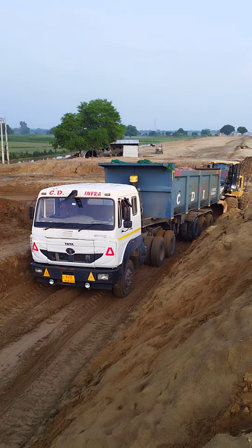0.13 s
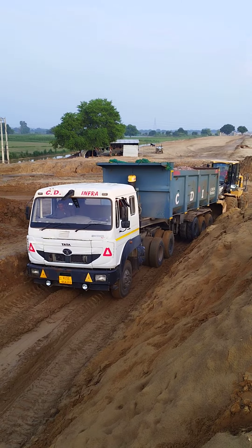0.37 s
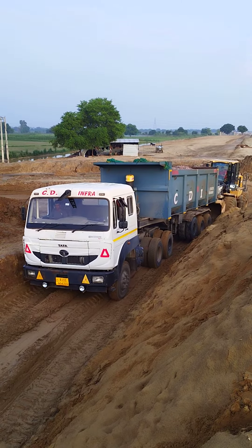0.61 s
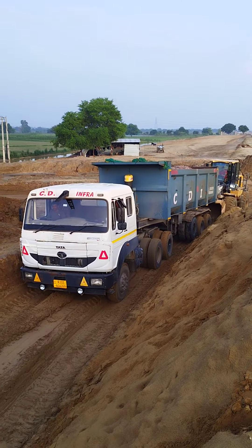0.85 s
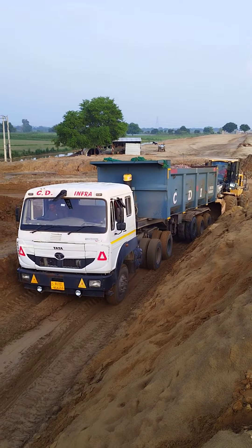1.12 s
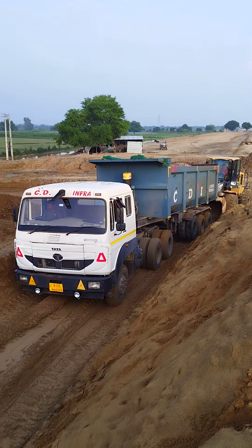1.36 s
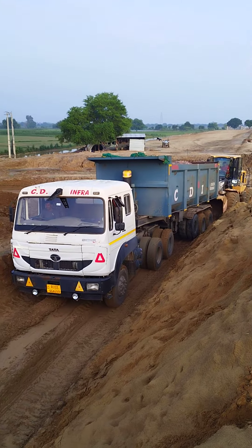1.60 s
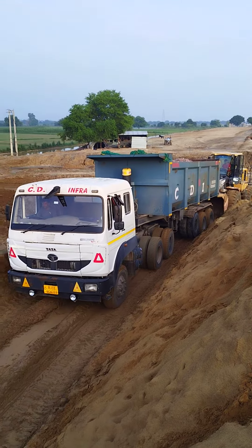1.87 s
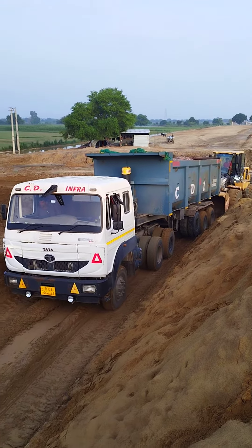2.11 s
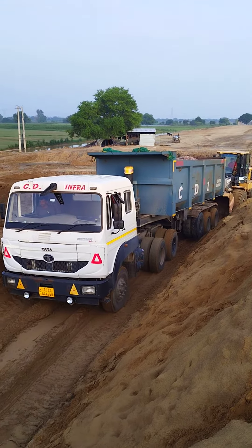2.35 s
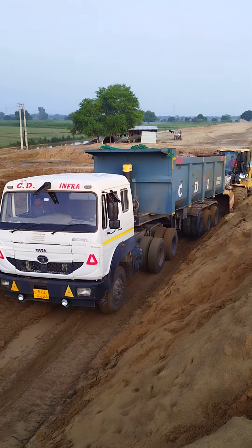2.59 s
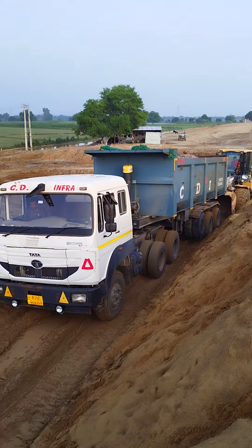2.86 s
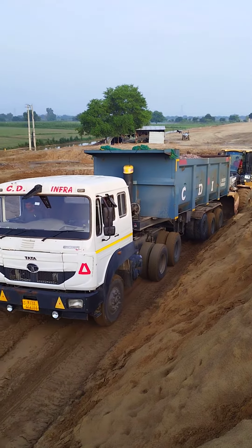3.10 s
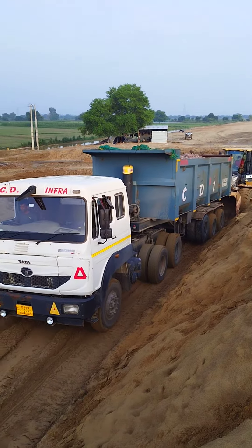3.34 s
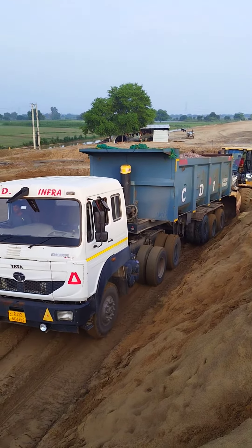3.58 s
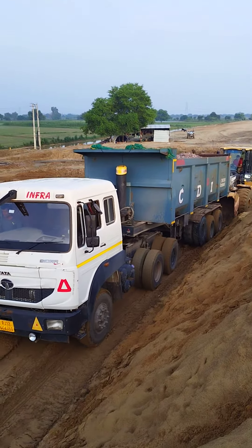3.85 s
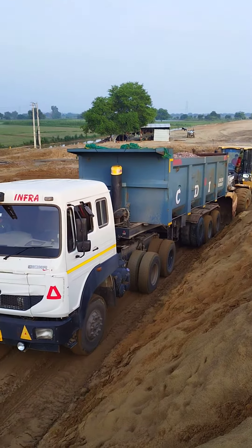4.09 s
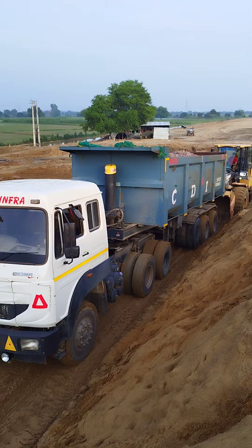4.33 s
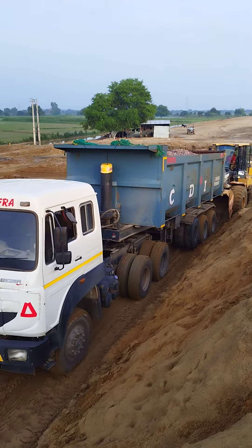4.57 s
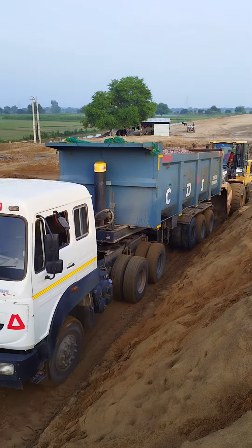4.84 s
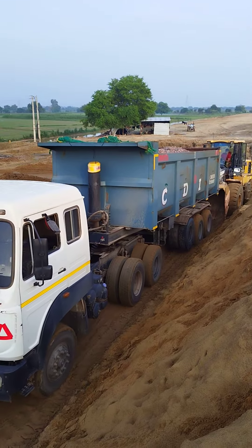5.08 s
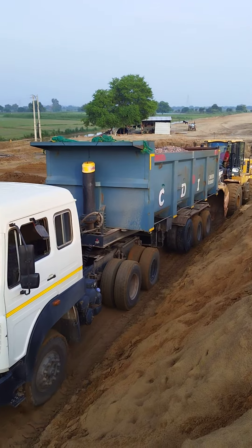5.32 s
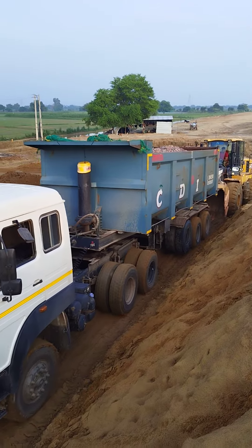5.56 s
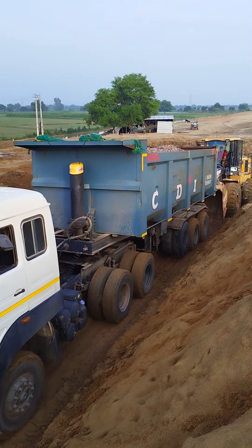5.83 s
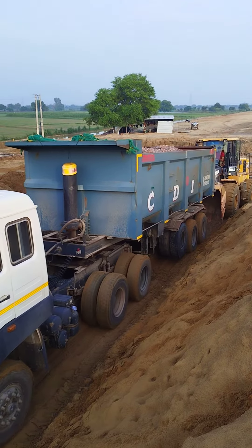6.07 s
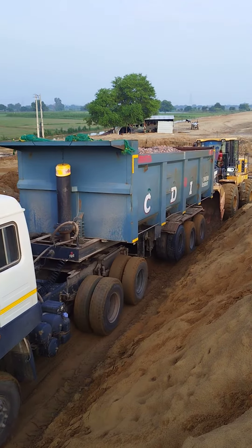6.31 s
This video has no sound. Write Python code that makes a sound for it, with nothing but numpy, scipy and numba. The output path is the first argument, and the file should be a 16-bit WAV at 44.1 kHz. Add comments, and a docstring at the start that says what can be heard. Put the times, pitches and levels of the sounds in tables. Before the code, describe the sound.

A heavy diesel truck is already labouring close by at 0 s, outdoors, caught in stereo by a phone. The thick low exhaust drone climbs from about 65 to 90 Hz by 1.7 s, then wavers slightly around there, load swelling and sagging. Rough mid-range clatter, valve tick and breathy hiss run throughout, over low rumble, a swelling pump hum and a thin, high turbo whistle. Steel sides drum softly in the first three seconds. From 1.3 to 5.9 s a loader's hum grows behind, over its own low drone. At 3.1 s a hard hollow steel bang makes the level duck briefly. At 4.4-4.6 s a small dry squeal slides downward, ending in a knock. From 4.7 to 5.4 s heavy body booms tumble, with a bright clattering knock at 5.3 s. Weaker thuds fade by 5.8 s; the engine drones on to the cut at 6.4 s.

```python
"""Diesel tipper pushed through soft sand

A six-cylinder tipper pulls hard past a phone's two microphone ports while a loader pushes from behind.
The exhaust drones as sines on the firing rate; clatter, valves and hiss are noise shaped by each rap of
the block. Near by, a gear pump hums, the steel body booms in ringing modes and knocks in noise bursts.
A joint squeals in falling partials, the turbo whistles, and the loader hums and drones behind the trailer.
The phone's limiter ducks after the loudest peaks."""
import sys
import numpy as np
from scipy import signal
from scipy.fft import rfft, irfft, next_fast_len
from scipy.io import wavfile
from scipy.ndimage import uniform_filter1d, map_coordinates
from numba import njit

SR = 44100
rng = np.random.default_rng(int(sys.argv[2]) if len(sys.argv) > 2 else 0)


def waveform_to_disk(signal):
    """Save audio, clipped to [-1, 1], as 16-bit WAV at the path in sys.argv[1]."""
    frames = np.transpose(np.atleast_2d(signal))
    scaled = np.clip(frames, -1, 1) * 32767
    samples = np.round(scaled).astype(np.int16)
    wavfile.write(sys.argv[1], SR, samples)


def voltage_ratio(level):
    """Linear amplitude factor for a level in decibels (scalar or array-like)."""
    return 10 ** (np.asarray(level, float) / 20)


N = 284004
T = np.arange(N) / SR  # time in seconds


# the engine under load: start_s, firing_hz, exhaust_load_db, block_past_cab_db
ENGINE = [(0, 65.28, 1.5, -2.5), (0.6, 74.25, 4.5, 1), (1.05, 81.76, -0.5, -3), (1.45, 87.2, 2.5, 1),
          (1.7, 89.8, -1, -0.5), (2.4, 89.17, 1.5, 1.5), (2.95, 92.1, -1, 0), (3.08, 92.05, -2, 2),
          (3.14, 90.76, -4, 0), (3.2, 91.2, 0, 0), (3.45, 87.18, 3, 2.5), (3.9, 88.6, -0.5, 1),
          (4.4, 90.53, 1.5, 2.5), (4.62, 89.86, 0, 1), (4.7, 89.36, -1, -1.5), (4.8, 89.47, -2, -2.5),
          (4.92, 90, 0, -1.5), (5.03, 89.5, -1, 0.5), (5.1, 89.55, 2.5, 2), (5.14, 89.06, 3.5, 2.5),
          (5.2, 89.5, -0.5, 2), (5.4, 91.46, 0.5, -1), (5.52, 91.6, 2.5, 0.5), (5.6, 91.2, -4, 0),
          (6.0, 87.2, -0.5, 0), (6.44, 87.2, 0.5, 2)]


def truck(shudders):
    """One crank drives it all: exhaust follows the load, the block is heard past the cab with echoes."""
    firing_hz, load_db, block_db = curves(ENGINE)
    firings = np.cumsum(firing_hz * (1 + 0.00408 * walk(30))) / SR
    pipe = voltage_ratio(load_db) * exhaust(firing_hz, firings)
    heard_block = voltage_ratio(block_db) * echoes(block(firings), db=-15.5)
    return pipe + heard_block + pump(firing_hz) + rumble(firings, shudders)


# the pipe booms most when the engine lugs: firing_hz, level_db (before the load)
NOTE = [(66, -10.5), (78, -12), (87, -14.5), (90, -16), (92, -19)]
# its octave: firing_hz, level_db (before the load)
OCTAVE = [(66, -24), (74, -30.5), (80, -30.5), (84.5, -21.5), (90, -21), (92, -27.5)]
# uneven cylinders: multiple of the four-stroke cycle, level_db (before the load)
UNEVEN = [(4, -39), (9, -36), (10, -35), (16, -39), (19, -37), (26, -39)]


def exhaust(firing_hz, firings):
    """Puffs make a note on the firing rate and its octave; uneven cylinders add cycle harmonics."""
    # the octave is locked to the note; each puff leans further forward as the pipe draws level
    lean = .1 + .35 * T  # radians
    note = voltage_ratio(at(NOTE, firing_hz) + 0.21 * walk(25.3)) * np.cos(2 * np.pi * firings)
    octave = voltage_ratio(at(OCTAVE, firing_hz) + 1.4 * walk(12)) * np.cos(4 * np.pi * firings + lean)
    lumps = 0
    for multiple, db in UNEVEN:
        phase = 2 * np.pi * (multiple * firings / 6 + rng.random())
        lumps = lumps + voltage_ratio(db + 3.0 * walk(5.4)) * np.sin(phase)
    return np.sqrt(2) * (note + octave + lumps)


# knock of each cylinder in firing order: level_db (relative)
CYLINDERS_DB = [0, -1.5, -3.5, -4.5, -4, -2]


def raps(firings):
    """Every combustion raps the block, some cylinders harder: a decaying envelope of rms 1."""
    which = firings.astype(int)
    strength = voltage_ratio(np.array(CYLINDERS_DB)[which % 6] + 5.4 * rng.standard_normal(N // 100)[which])
    decay = 1 + 0.07 * np.exp(-(firings % 1) / 0.23)  # decay in firings
    rap = uniform_filter1d(strength * decay, size=120)
    return rap / np.sqrt(np.mean(rap ** 2))


# clatter of the block: pitch_hz, level_db (per Hz, relative)
CLATTER = [(280, -53), (480, -15.5), (585, -13), (756, -5), (852, -8.5), (940, -2.5), (1040, -9.5),
           (1230, -12), (1450, -3.5), (2000, -20.5), (2600, -32), (4400, -120)]
# valve gear: pitch_hz, level_db (per Hz, relative)
VALVES = [(1150, -6.5), (1950, -8), (2660, -2.5), (3080, -8), (4510, -21.5), (6500, -26.5), (11000, -120)]
# intake hiss: pitch_hz, level_db (per Hz, relative)
HISS = [(2060, -60), (3500, -7.5), (6100, -7), (7900, -3), (9310, -6), (12800, -16), (15100, -14),
        (15800, -16)]
CLATTER_DB, VALVES_DB, HISS_DB = -29, -31.5, -35.5  # before the raps and the path past the cab


def block(firings):
    """Coloured noise that each rap lifts slightly; clatter and valves repeat with the engine cycle."""
    rap = raps(firings)
    cycles = firings / 6
    clatter = voltage_ratio(CLATTER_DB) * noise(CLATTER, flicker_db=1.0, rate=12., cycles=cycles) * rap ** 0.11
    valves = voltage_ratio(VALVES_DB) * noise(VALVES, flicker_db=1.3, rate=12., cycles=cycles) * rap ** 0.19
    hiss = voltage_ratio(HISS_DB) * noise(HISS, flicker_db=1.1, rate=11.) * rap ** 0.15
    hiss = hiss * (1 + .08 * np.cos(2 * np.pi * cycles))  # the intake breathes once a cycle
    return clatter + valves + hiss


# short reflections off ground, bank and trailer: delay_ms, drift_ms_per_s
ECHOES_MS = [(4.1, -.10), (7.3, .06), (11.9, -.15), (17.6, .12)]


def echoes(x, db):
    """Reflections whose paths change as the truck creeps on: narrow peaks that wander."""
    out = x.copy()
    for ms, drift in ECHOES_MS:
        place = np.arange(N) - (ms + drift * T) * SR / 1000
        out += voltage_ratio(db) * np.array([map_coordinates(port, [place], order=2, mode="mirror") for port in x])
    return out / np.sqrt(1 + len(ECHOES_MS) * voltage_ratio(2 * db))


# the pump's hum swells: peak_s, level_db
PUMP = [(1.2, -29), (2.4, -34.5), (3.4, -32.5), (5.7, -36), (6.402, -33)]
PUMP_DB, PUMP_SWELL_S = -44.5, 0.28  # hum between swells, spread of a swell


def pump(firing_hz):
    """A gear pump hums as one sine geared to the crank, rising and falling in swells."""
    level = voltage_ratio(PUMP_DB) + sum(swell(s, db, PUMP_SWELL_S) for s, db in PUMP)
    return level * tone(5.29 * firing_hz, 2 * walk(10))


# low rumble: pitch_hz, level_db (per Hz, relative)
RUMBLE = [(25, 1), (40, -11.5), (65, -5), (113, -3), (134, -9), (228, -5), (473, -14), (560, -30),
          (730, -56)]
# trailer sides that drum along: pitch_hz, level_db (per Hz, relative)
PANELS = [(250, -43), (290, -4), (335, -7), (385, -5), (430, -43)]
# drumming over rippled sand: peak_s, level_db, spread_s
DRUMMING = [(.3, -27.5, 0.49), (1.75, -27.5, 0.34), (2.3, -27.5, 0.24), (2.85, -28.5, 0.22),
            (4.4, -34, 0.35), (4.92, -21, 0.096), (5.55, -27, 0.26)]
RUMBLE_DB = -24.5  # before the shudders add to it
SHAKE_DB, SHAKE_S = -7, 0.17  # how much shudders feed the rumble, and their smoothing time


def rumble(firings, shudders):
    """Low noise gains power from the smoothed power of the shudders; the trailer sides drum in swells."""
    pole = 1 / (SHAKE_S * SR)
    shake = voltage_ratio(2 * SHAKE_DB) * signal.lfilter([pole], [1, pole - 1], shudders ** 2)
    level = np.sqrt(voltage_ratio(2 * RUMBLE_DB) + abs(shake))
    low = level * noise(RUMBLE, flicker_db=1.5, rate=4.9, cycles=firings / 6)
    drumming = sum(swell(*row) for row in DRUMMING)
    return low + drumming * noise(PANELS, flicker_db=3.0, rate=7.7)


# steel body modes: pitch_hz, width_hz
BODY = [(48, 12.06), (155, 10.5), (185, 35), (250, 16), (295, 38), (355, 15.5), (388, 23)]
# shudders over the ruts: peak_s, level_db (at a perfectly matched mode), shaken_hardest_hz, swell_s
BOOMS = [(.5, -18, 388, 0.05), (0.649, -26, 295, 0.46), (2.26, -28, 375, 0.046), (3.083, -19, 395, 0.0076),
         (3.088, -13, 266, 0.0098), (3.101, -11, 178, 0.01), (3.122, -3, 269.5, 0.008),
         (3.142, -13, 256, 0.0088), (3.165, -12, 170, 0.016), (4.645, -23.5, 390, 0.017),
         (4.703, -10, 345.2, 0.047), (4.85, -3.5, 155, 0.021), (4.979, -7, 153, 0.04),
         (5.1, -4.5, 155, 0.0047), (5.145, -15, 174, 0.014), (5.18, -9, 154.8, 0.0055),
         (5.265, -10, 170.8, .025), (5.26, -15.5, 48, .034), (5.31, -11, 164, 0.02),
         (5.368, -8.5, 275, 0.013), (5.49, -10.5, 260, 0.017), (5.555, -15, 160.2, 0.0082),
         (5.62, -13, 267, 0.019), (5.68, -18, 159, 0.017), (5.78, -17, 176.3, 0.015),
         (5.81, -19.5, 48.02, 0.014)]


def booms():
    """Each shudder swells the body modes near its pitch, which then ring down by their width."""
    out = np.zeros(N)
    for mode_hz, width in BODY:
        swing = np.zeros(N)
        for s, db, hz, swell_s in BOOMS:
            i = slice(max(int((s - 3 * swell_s) * SR), 0), int((s + .3) * SR))
            t = T[i] - s
            near = np.exp(-(np.log(mode_hz / hz) / 0.089) ** 2)
            shape = np.where(t < 0, np.exp(-(t / swell_s) ** 2), np.exp(-np.pi * width * t))
            swing[i] += voltage_ratio(db) * near * shape
        # loose plates and load rattle along: the ring wobbles in pitch and strength
        out += swing * tone(mode_hz * (1 + 0.015 * walk(40)), 2.5 * walk(70))
    return out


# steel on steel: peak_s, level_db, centre_hz, width_hz, decay_s
KNOCKS = [(3.075, -22.5, 7950, 5600, .004), (3.084, -30, 7400, 900, 0.02), (3.085, -21.5, 560.2, 750, .06),
          (4.636, -30, 7800, 5000, .012), (4.65, -24.5, 608.3, 775, 0.091), (5.236, -28, 3300, 2500, .012),
          (5.272, -33, 8000, 9000, .04), (5.292, -21.5, 4500, 4320, 0.021),
          (5.292, -18.5, 2230, 1700, 0.036), (5.298, -20, 895, 454, 0.064), (5.6, -25, 1200, 1300, .04)]


def knocks():
    """Band-passed noise bursts, partly common to both ports: loose steel chatters to a peak and dies."""
    out = np.zeros((2, N))
    t = np.arange(-SR // 20, SR // 5) / SR
    for s, db, hz, width, decay in KNOCKS:
        rise = 0.47 * decay
        edges = [max(hz - width / 2, 200), min(hz + width / 2, 15000)]
        band = signal.butter(2, edges, "bandpass", fs=SR, output="sos")
        chatter = rng.standard_normal((3, len(t))) * voltage_ratio(2.7 * rng.standard_normal(len(t)))
        burst = signal.sosfilt(band, chatter[0] + 1.0 * chatter[1:])
        shape = np.where(t < 0, np.exp(-(t / rise) ** 2), np.exp(-t / decay))
        i = int(s * SR) - SR // 20
        out[:, i:i + len(t)] += voltage_ratio(db) * burst / burst.std() * shape
    return out


# the squeal's glide: start_s, pitch_hz
SQUEAL = [(4.36, 5110), (4.405, 5040), (4.416, 4880), (4.44, 4800), (4.46, 4810), (4.515, 4760),
          (4.53, 4660), (4.56, 4570), (4.6, 4480)]
# its partials: partial, peak_s, level_db, spread_s
SQUEAL_SWELLS = [(1, 4.385, -38, .022), (1, 4.42, -37, .016), (1, 4.472, -43, .03), (1, 4.545, -39, .022),
                 (2, 4.385, -44, .025), (2, 4.43, -41, .025), (2, 4.485, -40, .025), (2, 4.53, -36, .032),
                 (3, 4.49, -54, .05)]


def squeal():
    """A dry joint slips and sings, falling in pitch, its partials swelling in turn."""
    hz = curves(SQUEAL)[0] * (1 + 0.0022 * walk(90))
    return sum(swell(s, db, spread) * tone(k * hz, 1.5 * walk(40)) for k, s, db, spread in SQUEAL_SWELLS)


# the whistle: start_s, pitch_hz, level_db
TURBO = [(0, 9200, -57), (.6, 9700, -56), (1.5, 11600, -59.5), (2.75, 11700, -59.5), (3.25, 10900, -64),
         (4.1, 12250, -58.5), (5, 11700, -62), (6.44, 12450, -61)]


def turbo():
    """The turbocharger's thin whistle is one unsteady sine whose pitch moves with boost."""
    hz, db = curves(TURBO)
    return tone(hz * (1 + .008 * walk(60)), db + 3.5 * walk(14))


# loader at steady revs behind the trailer: pitch_hz, level_db
LOADER_EXHAUST = [(108.5, -34), (144.5, -33)]
LOADER_DB, LOADER_IDLE_DB = -39, -49  # hum while pushing and otherwise, before the port balance
PUSH_FROM_S, PUSH_TO_S, PUSH_RAMP_S = 1.328, 5.915, 0.15


def loader():
    """A hydraulic hum that grows while it pushes, favouring the left port, over a low exhaust drone."""
    pushing = np.clip(np.minimum(T - PUSH_FROM_S, PUSH_TO_S - T) / PUSH_RAMP_S + .5, 0, 1)
    hum_db = LOADER_IDLE_DB + (LOADER_DB - LOADER_IDLE_DB) * pushing
    hum = tone(748 * (1 + .003 * walk(18)), hum_db + 3.5 * walk(12))
    drone = sum(tone(hz * (1 + 0.00422 * walk(2.5)), db + 1.0 * walk(5.1)) for hz, db in LOADER_EXHAUST)
    return hum * voltage_ratio([[2.5], [-2.5]]) + drone


# sound common to both ports: pitch_hz, share
ALIKE = [(300, 1), (690, 0.39), (950, 1), (1250, 0.47), (2600, 0.71), (4000, 0.095), (12000, 0.2)]
# balance of the ports: pitch_hz, left_minus_right_db
BALANCE_DB = [(340, -1), (520, -6.5), (700, 11), (870, 3), (1100, 1), (1500, -2), (2500, 0), (7200, -2.5),
              (10300, 4.5), (13000, -1)]
# the phone's case turns the left port's phase: pitch_hz, turn_radians
TURN = [(300, 0.03), (900, 0.067), (1200, 0.5), (1500, 0.53), (2400, 0.026)]
# what each four-stroke cycle repeats of the one before: pitch_hz, share
REPEATS = [(150, 0), (250, .5), (1100, .6), (1600, .5), (2400, .2), (3200, 0)]
PATTERN_DRIFT = .07  # slow change of the repeated pattern, radians per cycle


def noise(colour, flicker_db, rate, cycles=None):
    """Coloured noise at both ports, rms 1; half-octaves flicker apart; part may repeat with the cycle."""
    size = next_fast_len(N)
    hz = np.arange(size // 2 + 1) * SR / size
    white = rfft(rng.standard_normal((3, size)))
    if cycles is not None:
        steps = 2048  # noise points in the pattern of one cycle
        place = cycles % 1 * steps
        patterns = rng.standard_normal((6, steps))
        played = [np.interp(place, np.arange(steps), row, period=steps) for row in patterns]
        old, new = np.reshape(played, (2, 3, N))
        again = np.cos(PATTERN_DRIFT * cycles) * old + np.sin(PATTERN_DRIFT * cycles) * new
        repeated = at(REPEATS, hz)
        white = np.sqrt(1 - repeated) * white + np.sqrt(repeated) * rfft(again, size)
    common, left, right = white
    share = np.clip(at(ALIKE, hz), 0, 1)
    pair = np.sqrt(share) * common + np.sqrt(1 - share) * np.array([left, right])
    tilt = voltage_ratio(at(BALANCE_DB, hz) / 2) * np.exp(-.5j * at(TURN, hz))
    inside = (hz > colour[0][0]) * (hz < colour[-1][0])
    pair = pair * voltage_ratio(at(colour, hz)) * np.array([tilt, 1 / tilt]) * inside
    half_octave = 2 * np.log2(np.maximum(hz, 1))
    lowest, highest = int(2 * np.log2(colour[0][0])), int(2 * np.log2(colour[-1][0]))
    out = 0
    for k in range(lowest, highest + 2):
        band = irfft(pair * np.clip(1 - abs(half_octave - k), 0, 1), size)[:, :N]
        out = out + band * voltage_ratio(flicker_db * walk(rate))
    return out / np.sqrt(np.mean(out ** 2))


def tone(hz, db):
    """A sine of moving pitch at an rms level."""
    return np.sqrt(2) * voltage_ratio(db) * np.sin(2 * np.pi * (np.cumsum(hz) / SR + rng.random()))


def swell(s, db, spread):
    """A bell-shaped rise and fall."""
    return voltage_ratio(db) * np.exp(-((T - s) / spread) ** 2)


def walk(rate):
    """Random levels held 1 / rate s and slewed twice; spread near 1."""
    k = int(SR / rate)
    held = np.repeat(rng.standard_normal(N // k + 1), k)
    return 1.302 * uniform_filter1d(uniform_filter1d(held, k), k)[:N]


def curves(table):
    """Each column of a table as one value a sample."""
    s, *columns = np.transpose(table)
    return [np.interp(T, s, c) for c in columns]


def at(table, hz):
    """A spectrum read on a log frequency axis."""
    f, v = np.transpose(table)
    return np.interp(np.log(np.maximum(hz, 1)), np.log(np.maximum(f, 1)), v)


@njit
def follow(x, attack, release):
    """Peak envelope: quick up, slow down."""
    e, out = x[:2000].max(), np.empty(len(x))
    for i in range(len(x)):
        e += (x[i] - e) * (attack if x[i] > e else release)
        out[i] = e
    return out


LAG_MS_PER_S = 0.025  # the cab creeps past one port first


def scene():
    """Truck, body and knocks reach the left port ever later; whistle, squeal and loader are added."""
    shudders = booms()
    near = truck(shudders) + shudders + knocks()
    late = np.arange(N) - LAG_MS_PER_S * T * SR / 1000
    left = map_coordinates(near[0], [late], order=3, mode="nearest")
    return np.array([left, near[1]]) + turbo() + squeal() + loader()


LIMIT_DB, RATIO, ATTACK_S, RELEASE_S = -7.5, 8.4, 0.00049, 0.31  # the phone's limiter


def roll_off(x):
    """The treble ends steeply here."""
    return signal.sosfilt(signal.butter(12, 15900, fs=SR, output="sos"), x)


def record(dry):
    """The phone's limiter pulls both ports down after loud peaks, then a soft clip rounds what is left."""
    peak = follow(abs(dry).max(axis=0), 1 / (ATTACK_S * SR), 1 / (RELEASE_S * SR))
    held = dry * np.minimum(voltage_ratio(LIMIT_DB) / peak, 1) ** (1 - 1 / RATIO)
    mix = np.tanh(1.385 * held) / 1.185
    return roll_off(mix)


dry = scene()
out = record(dry)
waveform_to_disk(out)
```